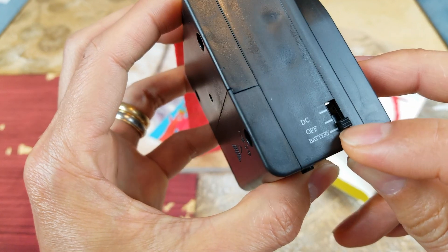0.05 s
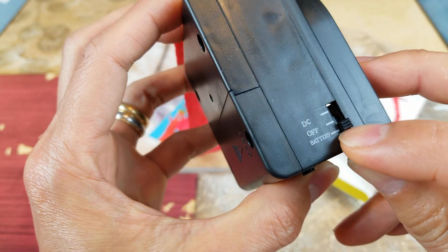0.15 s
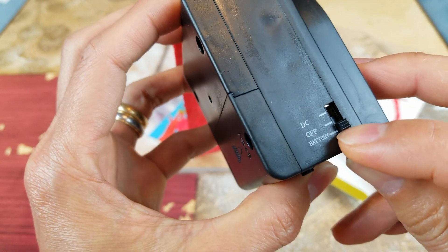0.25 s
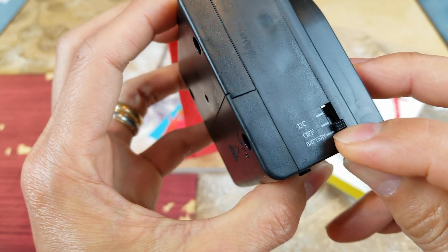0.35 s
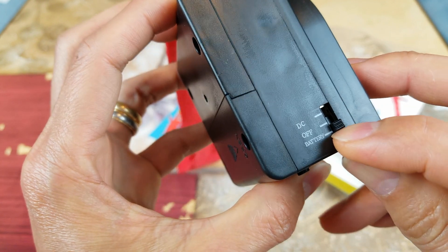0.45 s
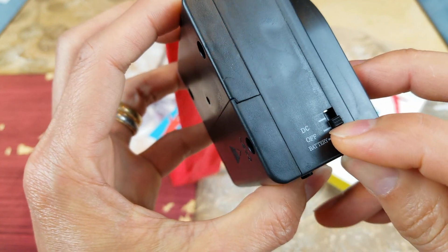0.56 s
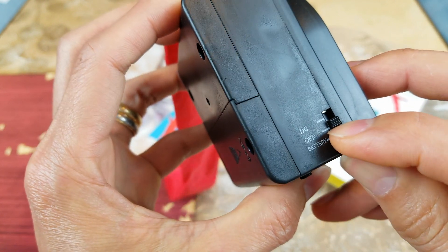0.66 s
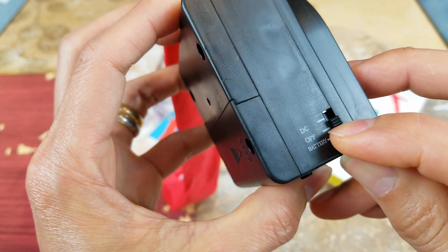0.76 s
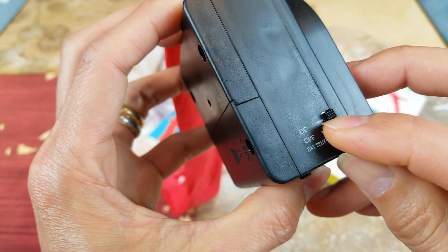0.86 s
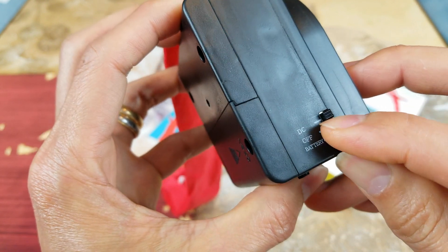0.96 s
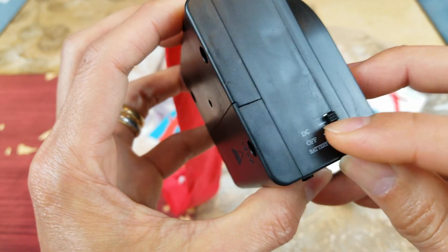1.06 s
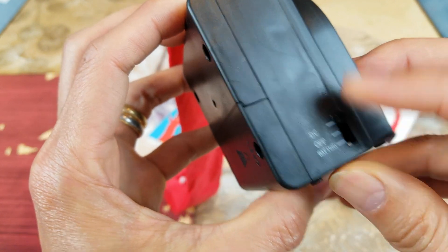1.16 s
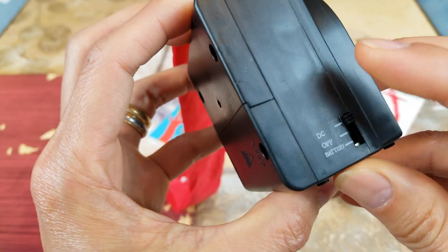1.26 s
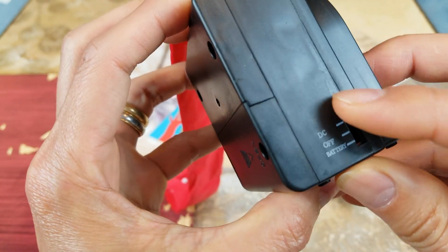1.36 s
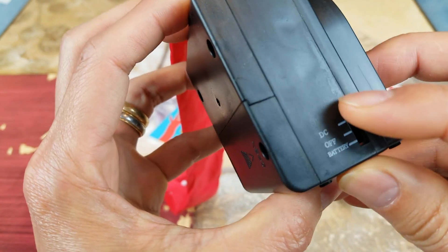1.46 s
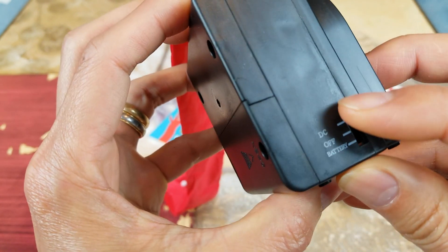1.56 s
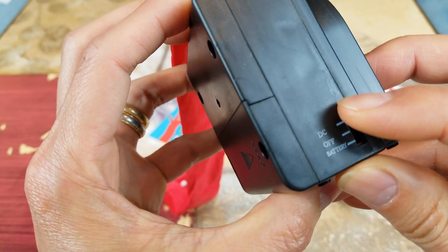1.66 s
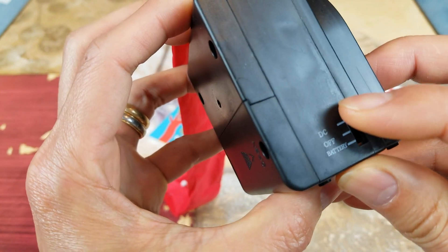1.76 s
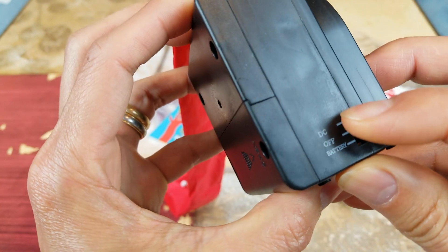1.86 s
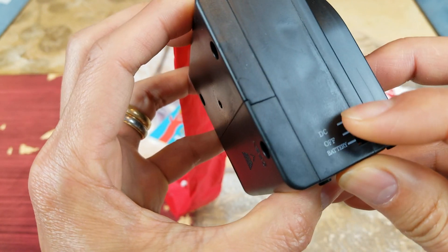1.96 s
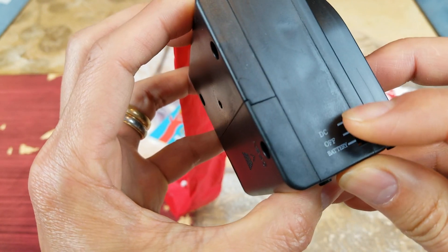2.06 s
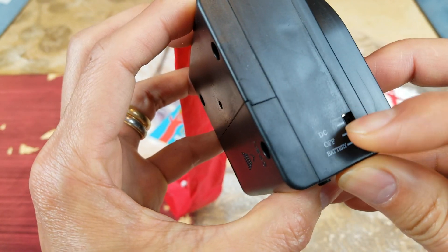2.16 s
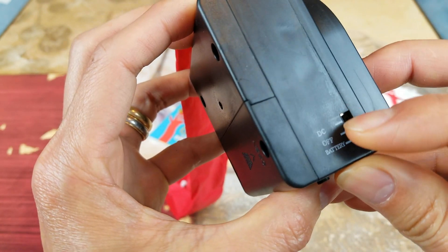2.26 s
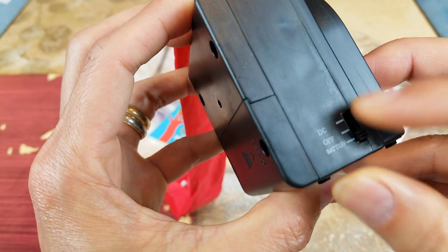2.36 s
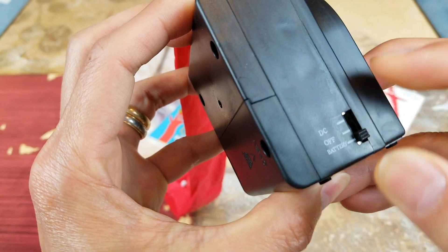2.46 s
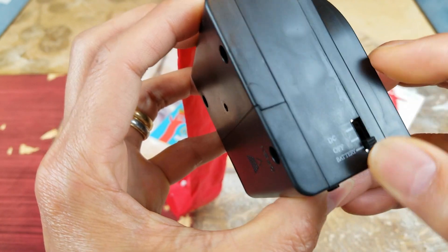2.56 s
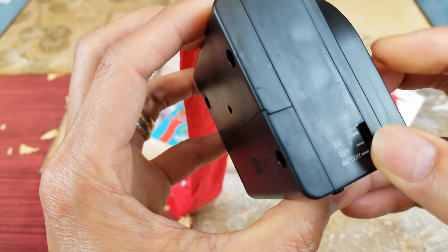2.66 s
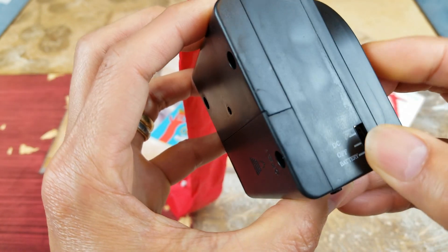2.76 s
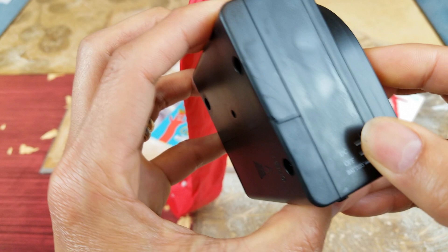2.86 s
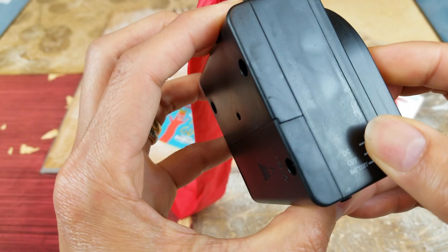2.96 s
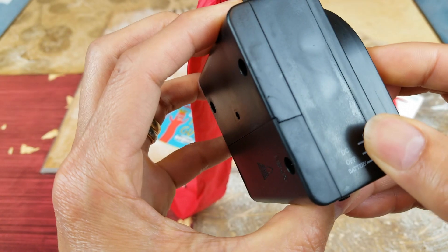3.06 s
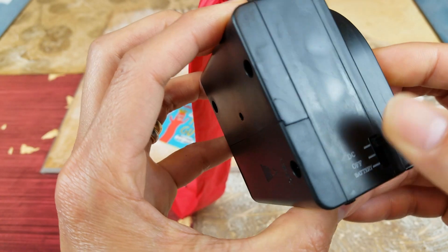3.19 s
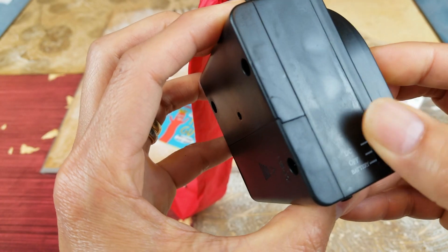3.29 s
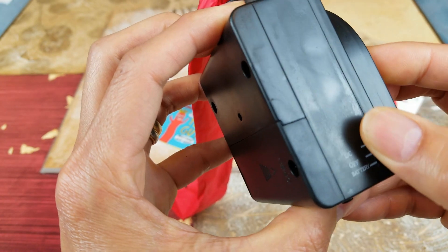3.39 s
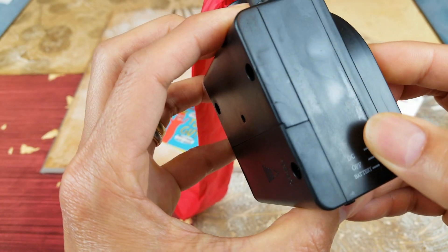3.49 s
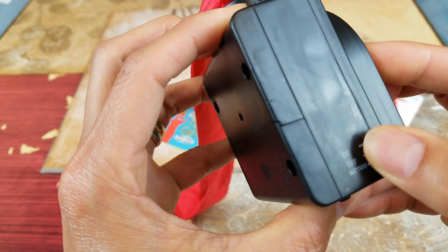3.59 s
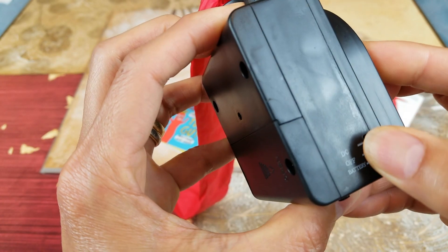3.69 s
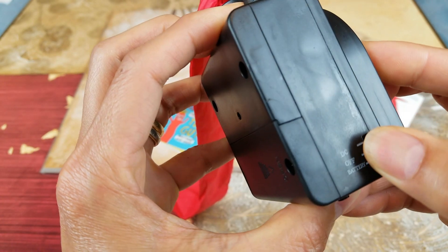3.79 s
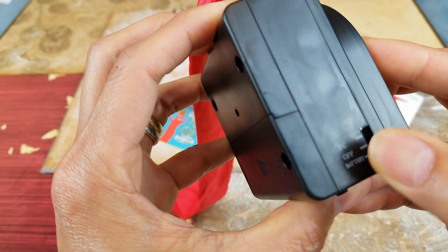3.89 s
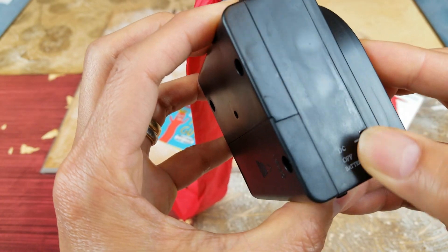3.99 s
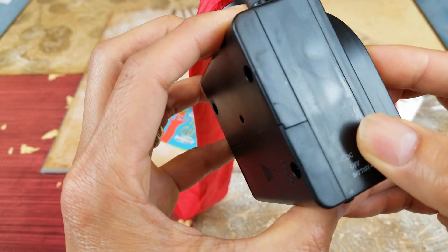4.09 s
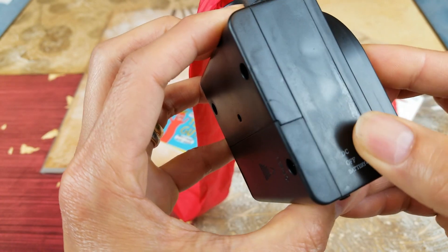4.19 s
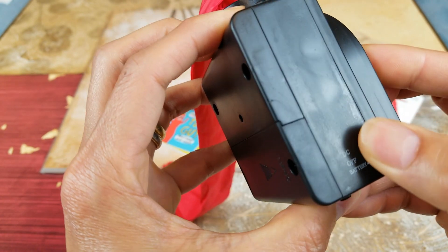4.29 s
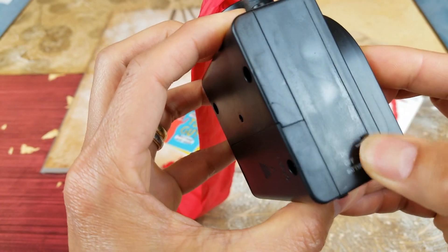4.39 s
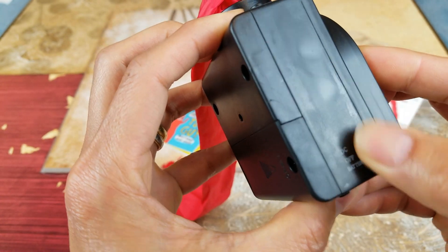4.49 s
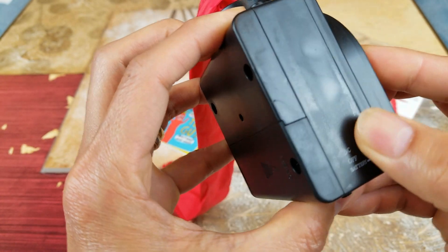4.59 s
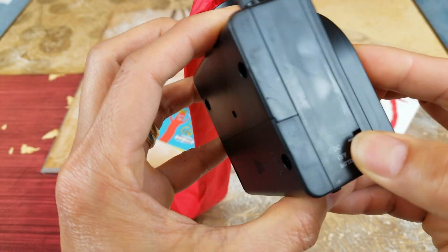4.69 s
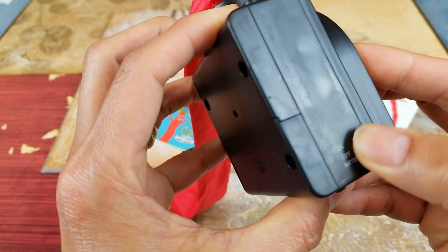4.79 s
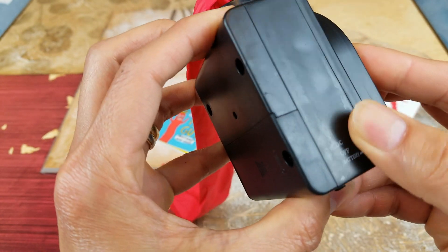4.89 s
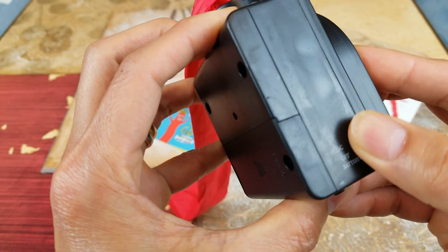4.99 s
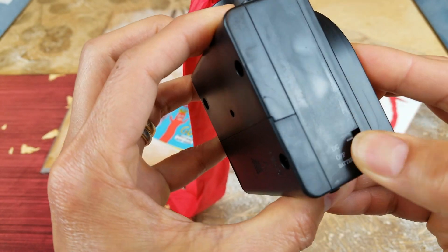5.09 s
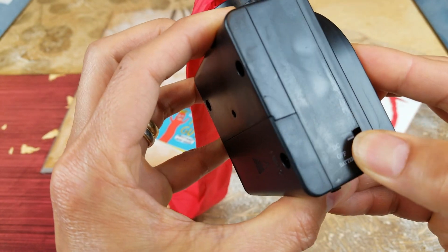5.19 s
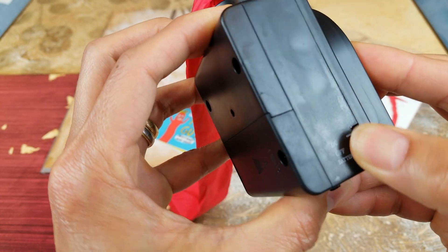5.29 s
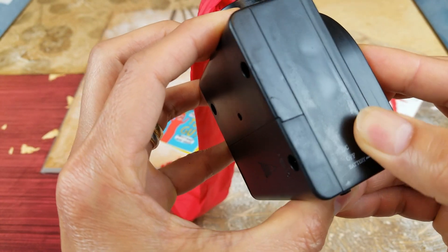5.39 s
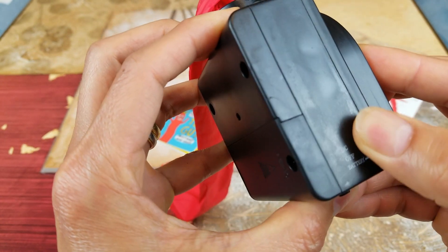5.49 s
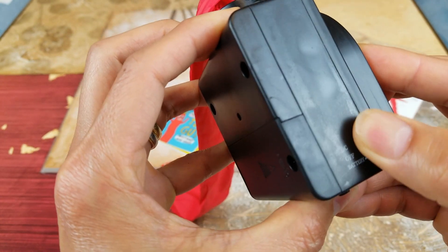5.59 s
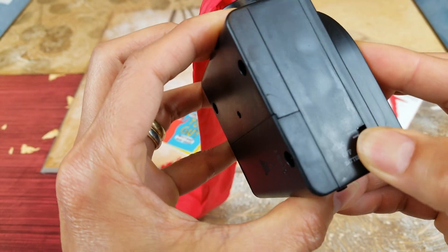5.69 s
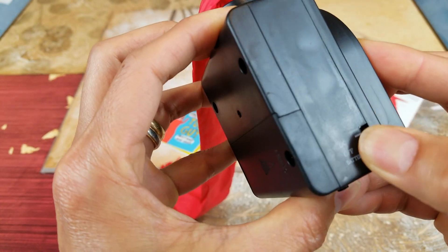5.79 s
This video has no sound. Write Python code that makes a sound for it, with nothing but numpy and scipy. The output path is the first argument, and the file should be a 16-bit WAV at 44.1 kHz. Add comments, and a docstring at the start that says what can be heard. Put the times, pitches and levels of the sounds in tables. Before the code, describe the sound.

A small plastic slide switch on a hollow handheld case is flicked close to the microphone, slightly to the left, in a quiet room. Each click is sharp, thin and bright, with a tiny metallic spring ring and a very short room echo. Single clicks come at about 0.5, 0.8, 1.8 and 2.0 seconds, with faint fingertip rubs and taps on the case around them and until about 4 seconds. Double clicks follow at 2.8, 3.5 and 4.0 seconds. From 4.3 to 5.0 seconds the switch goes rapidly back and forth in five double clicks, then two more pairs land at 5.3 and 5.6 seconds. Some flicks begin with a slight scrape. The hand gives a few soft low thuds, most noticeably near 2.1 and 4.5 seconds. Faint steady hiss, low room rumble and a slight hum lie beneath throughout.

```python
"""In a quiet room, a small plastic slide switch is flicked through its detents near the left microphone port.
Each detent is a few milliseconds of chatter that excites the modes of the slider and the hollow case;
a metal spring rings on and the room reverberates briefly. Between flicks a fingertip brushes and taps
the case, and the hand gives a few low thuds. Beneath lie microphone hiss, room rumble and a faint hum."""
import sys
import numpy as np
from scipy import signal
from scipy.fft import rfft, irfft
from scipy.io import wavfile
from scipy.ndimage import uniform_filter1d

SR = 44100
rng = np.random.default_rng(int(sys.argv[2]) if len(sys.argv) > 2 else 0)


def wav_record(signal):
    """Record a signal, one row per channel, as 16-bit PCM in the file named by sys.argv[1]."""
    frames = np.transpose(np.atleast_2d(signal))
    bounded = np.clip(frames, -1, 1)
    # unit amplitude maps onto the largest positive 16-bit level
    quanta = np.round(bounded * 32767).astype(np.int16)
    wavfile.write(sys.argv[1], SR, quanta)


N = 257808
NOISE_TOP_HZ = 15780  # upper edge of hiss and reverberation


def switch():
    """Impact excitation: snaps, releases and taps drive the same parts with different force and decay."""
    # detent snaps, the last three levels re slider: start_s, slider_db, grip_hz, panel_db, case_db, knock_db
    snaps = [(0.4954, -14, 11360, -13.5, -18, -28), (0.8092, -19.5, 9900, -8.5, -17.5, -28.5),
             (1.7928, -16.5, 14960, -4, -22, -42), (2.0493, -18, 14960, 1, -8.5, -30.5),
             (2.8004, -13.5, 15050, -14.5, -21, -44.5), (2.8258, -17, 10080, -3.5, -13.5, -37),
             (3.4828, -17, 12900, -5.5, -14, -24), (3.5609, -15, 11970, -9.5, -21.5, -22.5),
             (3.9877, -20.5, 14600, -1, -13, -38), (4.0124, -14.5, 10200, -11.5, -13.5, -29),
             (4.305, -15.5, 12400, -11, -18, -29.5), (4.3672, -18, 11300, -4.5, -14, -18),
             (4.4614, -15.5, 9760, -9.5, -11.5, -21.5), (4.4773, -16, 9800, -4.5, -12.5, -22.5),
             (4.6194, -13, 13480, -6.5, -17.5, -32), (4.6471, -19, 12200, -6, -17, -20.5),
             (4.8058, -18, 12500, -4, -16.5, -35), (4.831, -16, 10000, -8, -17.5, -25.5),
             (5.0066, -15.5, 11300, -6.5, -14.5, -32.5), (5.0305, -17, 12800, -7.5, -16.5, -24),
             (5.2928, -19, 9550, -3.5, -14.5, -26.5), (5.3565, -18.5, 10900, -2.5, -15, -41),
             (5.6044, -14.5, 12180, -7.5, -18.5, -41), (5.6282, -19, 12500, -5.5, -16, -25.5)]
    # the slider slips from its notch and scrapes toward the next: start_s, slider_db, t60_s
    releases = [(0.8024, -40, 0.13), (2.046, -38.5, .1), (2.79, -45.5, 0.078), (3.472, -44, 0.062),
                (3.545, -39, .05), (3.978, -43, .09), (4.295, -39, 0.021), (4.354, -33, .03),
                (4.45, -35, 0.057), (4.6104, -37, 0.057), (4.796, -36, 0.17), (4.9954, -35.5, 0.0089),
                (5.272, -57.5, .014), (5.283, -37, .08), (5.593, -39, 0.14)]
    # fingertip taps, the last two levels re slider: start_s, slider_db, panel_db, knock_db
    taps = [(1.1062, -48, -0.5, -11), (1.1472, -47.5, -4.5, -19), (1.286, -72, -1, -16),
            (2.2675, -59.5, -5, -7), (2.51, -74, -5, 14), (2.5527, -71, -1, -14), (3.1173, -64.5, -2, -13),
            (3.674, -59, -12, -29), (3.934, -68.5, 0.5, -22), (5.249, -50.5, -19, -26.5)]
    out = np.zeros((2, N))
    for row in snaps:
        contact(out, *row, t60_s=.0082, room_db=-10)
    for start_s, slider_db, t60_s in releases:
        contact(out, start_s, slider_db, grip_hz=11000, panel_db=-5, case_db=-10, knock_db=-32.5,
                t60_s=t60_s, room_db=-14)
    for start_s, slider_db, panel_db, knock_db in taps:
        contact(out, start_s, slider_db, grip_hz=5900, panel_db=panel_db, case_db=panel_db - 3,
                knock_db=knock_db, t60_s=.011, room_db=-4)
    for start_s, slider_db, *_ in snaps:
        add(out, start_s, spring(slider_db))
    return ports(highpass(out, 88, order=2))  # the ports vent the slowest pressure changes


def contact(out, start_s, slider_db, grip_hz, panel_db, case_db, knock_db, t60_s, room_db):
    """Modal response: dying micro-impacts ring each part; direct sound and echo are added to out."""
    # modes of each part, and of the body's dull knock: pitch_hz, width_hz, gain_db
    slider = [(10390, 370, 2.5), (11750, 1700, 0.5), (12840, 1300, 1.5), (15490, 1100, -6)]
    panel = [(4890, 360, -1.5), (6140, 1916, 6.5), (7265, 2290, 6.5), (8843, 590, 9)]
    case = [(2710, 610, -3.5), (3130, 230, 4.5), (4036, 830, 1)]
    lid = [(1590, 380, 5), (1694, 190, 8.5), (2106, 250, -1)]
    knock = [(446, 750, -1), (790, 540, 7.4), (1250, 600, 3)]
    cavity = [(404, 66, -4), (720, 160, 3)]
    # right port re left, for slider, panel, case, lid, knock, thump and cavity: gain_db
    far_db = [-5, 0.5, -5, -7, -20, -13, -1]
    t = np.arange(1300) / SR
    near, scattered, size = rng.standard_normal((3, len(t)))
    bounces = amp(2.5 * unit_rms(uniform_filter1d(size, size=12)))
    attack = (1 - np.exp(-t / .00043)) ** 2
    decay = amp(-60 * t / t60_s)
    rattle = amp(-13.5) * decay ** (1 / 3.04)  # weaker, and about three times as long
    far = .55 * np.roll(near, 2) + .8 * scattered  # partly scattered by the hand
    chatter = attack * (decay + rattle) * bounces * np.array([near, far])
    blow = np.exp(-t / .00027) * t * np.ones((2, 1))  # one soft pulse into the body
    thump = np.sign(near[0]) * np.exp(-t / .0015) * t  # short and low, mostly left, of random polarity
    bodies = [slider + [(grip_hz, 580, 3)], panel, case, lid]  # the grip leaves one mode ringing most
    parts = [ring(chatter, modes) for modes in bodies]
    parts += [ring(blow, knock), np.array([thump, np.roll(thump, 60)]), ring(chatter, cavity)]
    parts[0] = highpass(parts[0], min(8800, .85 * grip_hz), order=3)  # a tiny slider radiates lows poorly
    levels_db = slider_db + np.array([0, panel_db, case_db, case_db - 9,
                                      knock_db, knock_db - 2, case_db - 21.5])
    onset_s = start_s - .0004
    for part, level_db, right_db in zip(parts, levels_db, far_db):
        rms = np.sqrt((part ** 2).sum(1, keepdims=True) / (.008 * SR))  # energy spread over 8 ms
        add(out, onset_s, part / rms * amp(level_db) * amp([[0], [right_db]]))
    add(out, onset_s, room_echo(bodies + [knock], levels_db[:5] + room_db))


def spring(slider_db):
    """Free vibration: the metal contact spring rings on, each mode with a chance strength and phase."""
    # spring modes, levels re slider: pitch_hz, max_level_db, t60_s
    modes = [(8760, -27.5, .16), (9720, -22, 0.18), (10880, -26, .22)]
    t, out = np.arange(12000) / SR, 0
    for pitch_hz, max_level_db, t60_s in modes:
        level_db = slider_db + max_level_db - 9 * rng.random()
        phase = rng.random((2, 1))
        out = out + amp(level_db - 60 * t / t60_s) * np.sin(2 * np.pi * (pitch_hz * t + phase))
    return out


def ports(sound):
    """Directivity: the right port faces away, so the switch is weaker there and differently coloured."""
    # right port response re left: frequency_hz, gain_db
    response = [(500, -5), (3000, -5), (5200, -4), (7400, -2.5), (9400, -10), (10600, -6.5), (13200, -7),
                (15400, -7)]
    left, right = sound
    hz = np.fft.rfftfreq(len(right), 1 / SR)
    return np.array([left, irfft(rfft(right) * amp(curve(response, hz)), len(right))])


def rubs():
    """Sliding friction: skin makes grainy noise that swells, fades and rings the case and panel."""
    # fingertip strokes: start_s, length_s, peak_db
    strokes = [(.305, 0.16, -60.5), (0.456, 0.051, -60), (1.079, 0.12, -62), (1.749, 0.046, -62),
               (3.096, 0.18, -75), (3.316, 0.12, -72.5)]
    # modes that skin excites: pitch_hz, width_hz, gain_db
    modes = [(2990, 300, 2.5), (4670, 1100, -1), (6180, 460, 4.5), (10400, 2600, -5)]
    out = np.zeros((2, N))
    for start_s, length_s, peak_db in strokes:
        left, right, size = rng.standard_normal((3, 8000))[:, :round(length_s * SR)]
        friction = np.array([left, right]) * amp(2.1 * size)
        swell = np.interp(np.linspace(0, 1, len(left)), [0, .38, 1], [0, 1, 0])
        add(out, start_s, unit_rms(ring(friction, modes)) * amp(peak_db) * swell)
    return out * amp([[2], [-2]])  # panned left


def thuds():
    """Damped oscillation: a jolt of the hand gives a few low cycles that sag in pitch."""
    # jolts of the hand: start_s, peak_db, pitch_hz
    jolts = [(1.127, -60.5, 70.0), (2.055, -52.5, 67.3), (4.477, -49.5, 56.5), (4.828, -58.5, 48.4),
             (5.629, -56, 60.3)]
    out, t = np.zeros((2, N)), np.arange(5000) / SR
    rise_s, lag_rad = .018, np.array([[0], [1.1]])
    swell = t / rise_s * np.exp(1 - t / rise_s)
    for start_s, peak_db, pitch_hz in jolts:
        phase = 2 * np.pi * pitch_hz * t * (1 - t)
        add(out, start_s, amp(peak_db) * swell * np.sin(phase - lag_rad))
    return out * amp([[3], [-3]])  # panned left


def room_echo(bodies, levels_db):
    """Diffuse reverberation: noise coloured like the ringing parts, each band dying at its own rate."""
    # reverberation time: frequency_hz, t60_s
    decay_times = [(300, 0.14), (1500, 0.14), (3500, 0.23), (7000, 0.27), (10300, 0.25), (12000, .24),
                   (14000, .21), (15500, 0.22)]
    # colour of the reverberant tail, with a high peak near 15.4 kHz: frequency_hz, gain_db
    tail_colour = [(300, 3.5), (1000, -4.5), (2500, 0.5), (7000, -3), (9700, -0.5), (10300, -2.5),
                   (12500, -4), (14500, -2.5), (15400, 1)]
    hz, t = np.fft.rfftfreq(256, 1 / SR), np.arange(280) * 64 / SR
    power = 0
    for modes, level_db in zip(bodies, levels_db):
        colour = sum(amp(2 * gain_db) / (1 + (2 * (hz - pitch_hz) / width_hz) ** 2) ** 1.27
                     for pitch_hz, width_hz, gain_db in modes)
        power = power + amp(2 * level_db) * colour / colour.sum()
    spectrum = np.sqrt(power) * amp(curve(tail_colour, hz)) * (hz < NOISE_TOP_HZ)
    decay = amp(-60 * t / curve(decay_times, hz)[:, None])
    real, imag = rng.standard_normal((2, 2, len(hz), len(t)))
    tail = signal.istft((real + 1j * imag) * spectrum[:, None] * decay, nperseg=256, noverlap=192)[1]
    build_up = np.clip((np.arange(tail.shape[1]) / SR - .003) / .013, 0, 1)  # reflections arrive late
    return tail * build_up


def noise_floor():
    """Random noise: microphone hiss and room rumble, coherent only in the bass, with a whine and a hum."""
    # relative spectral density: frequency_hz, level_db
    density = [(25, -29.5), (42, 0.5), (145, -1), (168, -6.5), (200, -4), (313, -8.5), (432, -10),
               (477, -10.5), (567, -11.5), (2110, -15), (3920, -17.5), (8040, -26), (15700, -9)]
    # excess of left over right: frequency_hz, level_db
    balance = [(60, 6.5), (150, 4), (380, 4), (950, 3.5), (2380, 2), (5980, 2.5), (15000, 5.5)]
    # likeness of the two ports: frequency_hz, correlation
    coherence = [(60, 0.79), (150, 0.13), (350, .02)]
    frames, hz = N // 256 + 5, np.fft.rfftfreq(1024, 1 / SR)
    left_re, left_im, own_re, own_im, patches = rng.standard_normal((frames, len(hz), 5)).T
    flicker = amp(.6 * unit_rms(uniform_filter1d(uniform_filter1d(patches, 10, 0), 12, 1)))
    shared = curve(coherence, hz)[:, None]
    left = left_re + 1j * left_im
    right = shared * left + np.sqrt(1 - shared ** 2) * (own_re + 1j * own_im)
    lean_db = curve(balance, hz) / 2
    colour = amp(curve(density, hz) + np.array([lean_db, -lean_db])) * (hz < NOISE_TOP_HZ)
    spectra = np.array([left, right]) * colour[:, :, None] * flicker
    hiss = signal.istft(spectra, nperseg=1024, noverlap=768)[1][:, :N]
    out = highpass(amp(-64) * unit_rms(hiss), 38, order=4)
    out[0] += noise_tone(pitch_hz=15300, width_hz=60, level_db=-92)  # faint whine, left port
    return out + noise_tone(pitch_hz=146, width_hz=8, level_db=-83.5)  # a distant appliance


def noise_tone(pitch_hz, width_hz, level_db):
    """Narrow-band noise: a sharp resonance turns white noise into a wavering tone."""
    return amp(level_db) * unit_rms(ring(rng.standard_normal(N), [(pitch_hz, width_hz, 0)]))


def ring(force, modes):
    """Modal superposition: damped resonators of alternating sign share one driving force."""
    return sum((-1) ** k * amp(gain_db) * signal.lfilter(*signal.iirpeak(hz, hz / width_hz, SR), force)
               for k, (hz, width_hz, gain_db) in enumerate(modes))


def highpass(x, cutoff_hz, order):
    """Roll-off below the cutoff, 6 dB an octave for each order."""
    return signal.sosfilt(signal.butter(order, cutoff_hz, "high", fs=SR, output="sos"), x)


def amp(db):
    """Decibels as an amplitude ratio."""
    return 10 ** (np.asarray(db) / 20)


def unit_rms(x):
    """Normalisation to unit mean power."""
    return x / np.sqrt(np.mean(x ** 2) + 1e-20)


def curve(points, hz):
    """Interpolation along a logarithmic frequency axis."""
    knots_hz, values = np.transpose(points)
    return np.interp(np.log(hz + 1), np.log(knots_hz + 1), values)


def add(mix, start_s, sound):
    """Superposition of a sound on the mix from start_s on."""
    part = mix[..., round(start_s * SR):][..., :sound.shape[-1]]
    part += sound[..., :part.shape[-1]]


def scene():
    """Superposition: the pressures of all sources add at the two ports."""
    return switch() + rubs() + thuds() + noise_floor()


def record(dry):
    """Saturation and band limiting: peaks clip at full scale, then the highest treble is cut."""
    lowpass = signal.firwin(255, cutoff=16500, window=("kaiser", 8), fs=SR)
    limited = signal.oaconvolve(np.clip(dry, -1, 1), lowpass[None], "same")
    return np.clip(limited, -1, 1)


dry = scene()
out = record(dry)
wav_record(out)
```